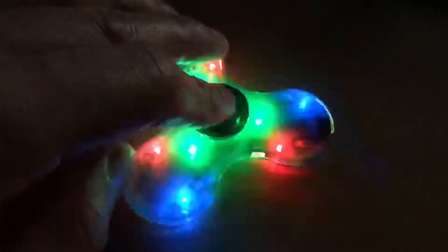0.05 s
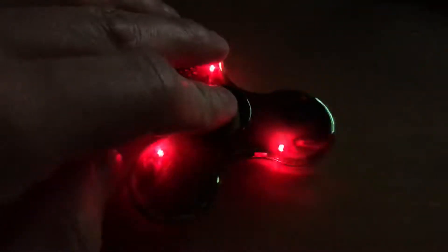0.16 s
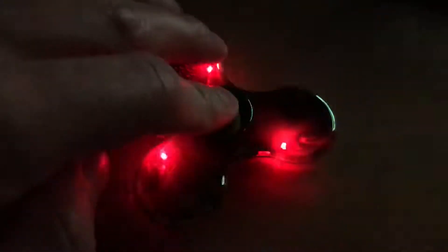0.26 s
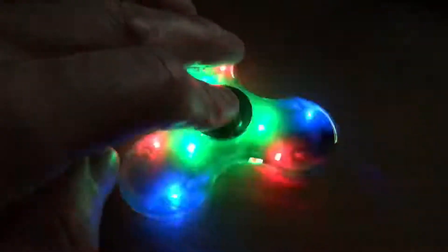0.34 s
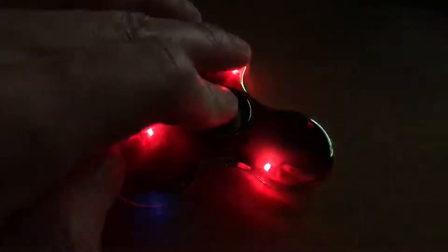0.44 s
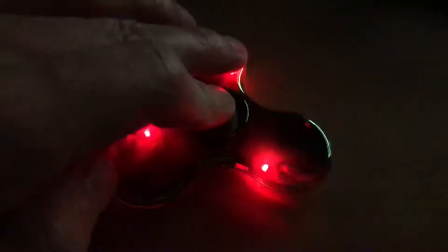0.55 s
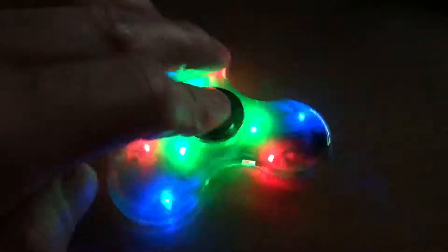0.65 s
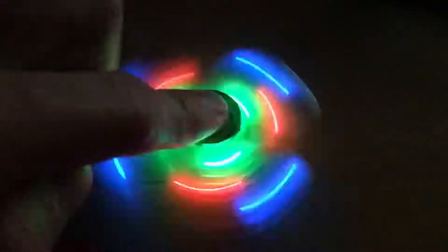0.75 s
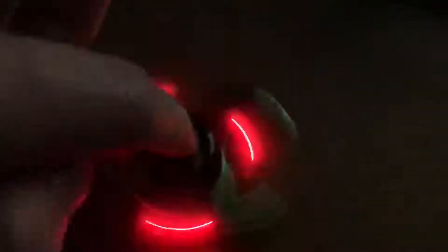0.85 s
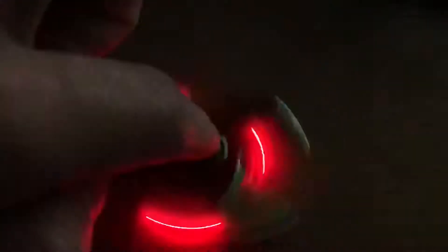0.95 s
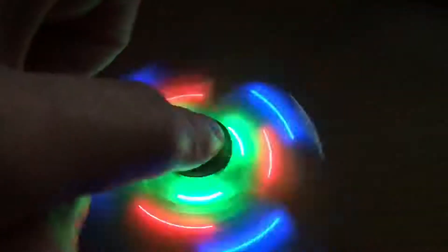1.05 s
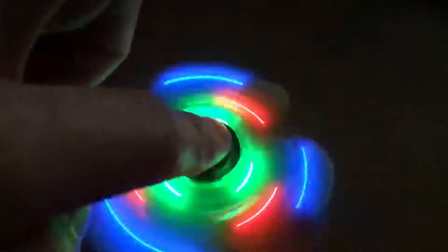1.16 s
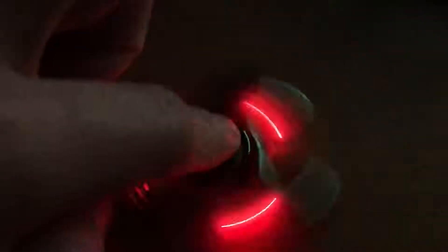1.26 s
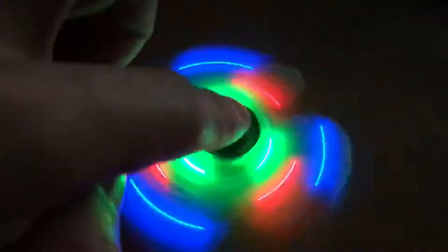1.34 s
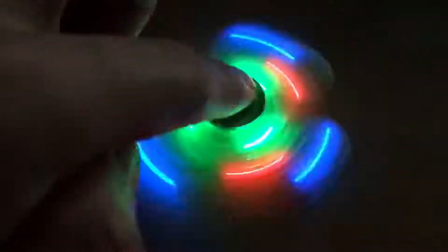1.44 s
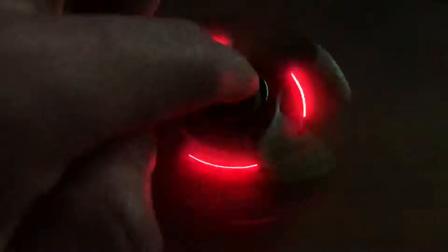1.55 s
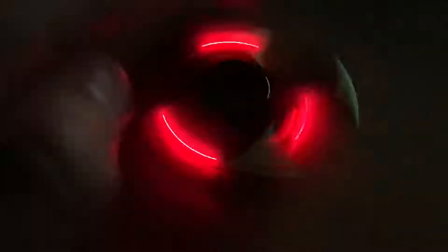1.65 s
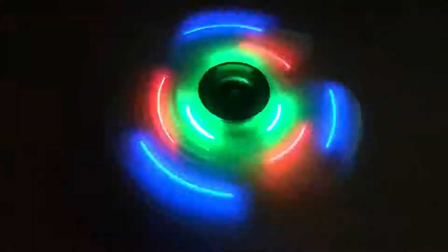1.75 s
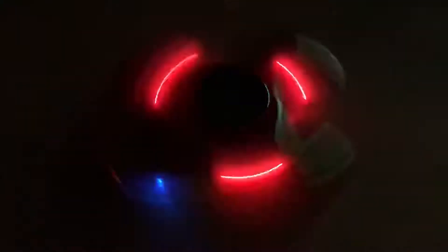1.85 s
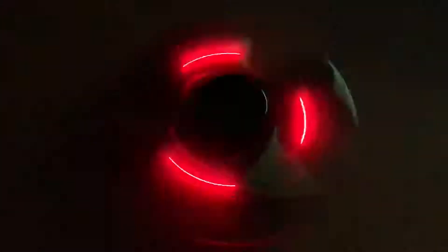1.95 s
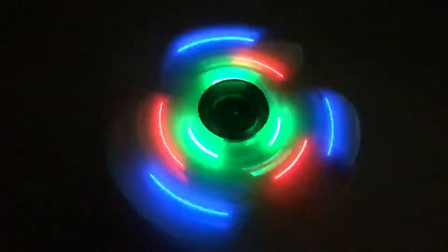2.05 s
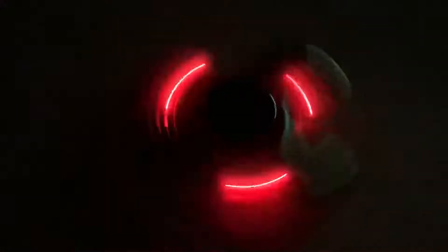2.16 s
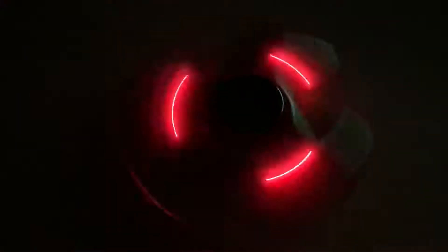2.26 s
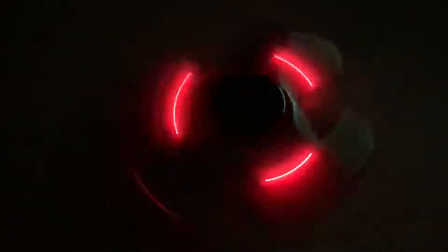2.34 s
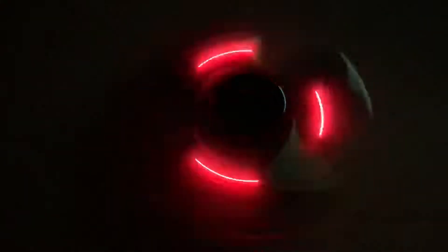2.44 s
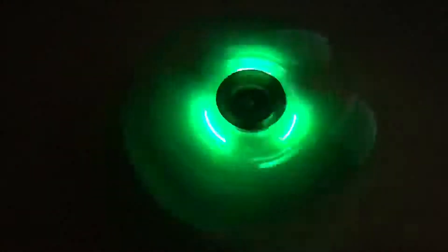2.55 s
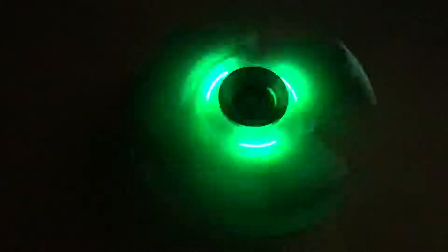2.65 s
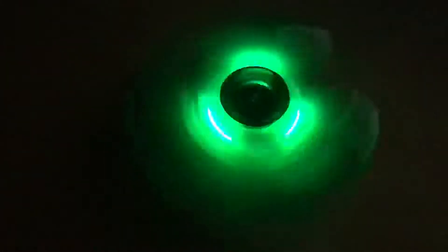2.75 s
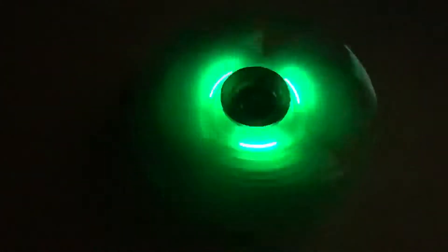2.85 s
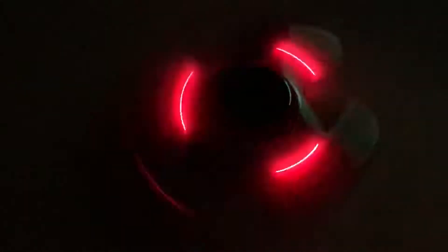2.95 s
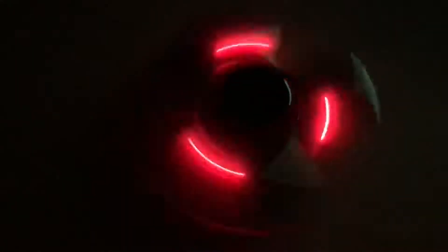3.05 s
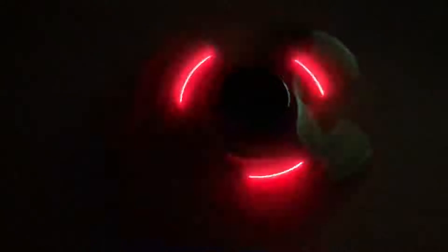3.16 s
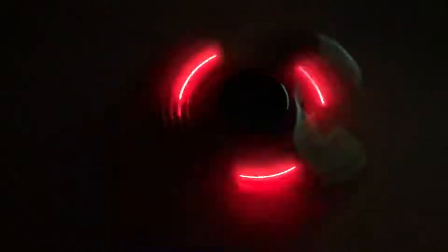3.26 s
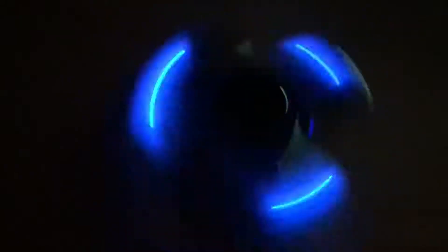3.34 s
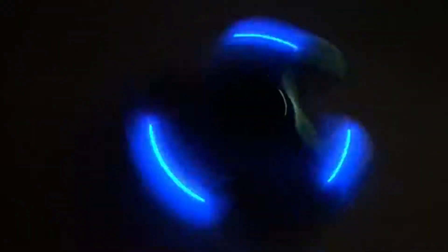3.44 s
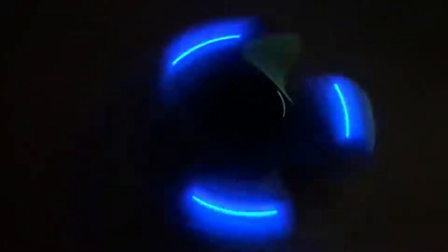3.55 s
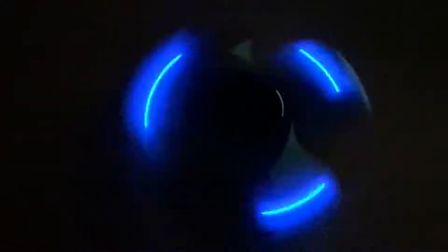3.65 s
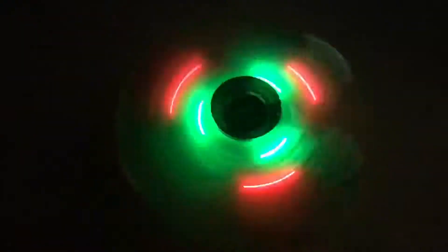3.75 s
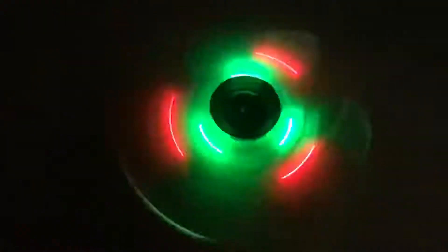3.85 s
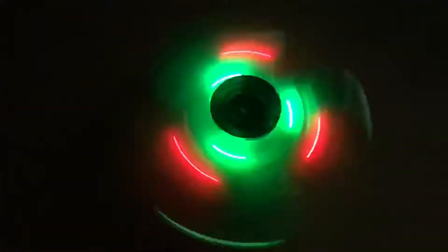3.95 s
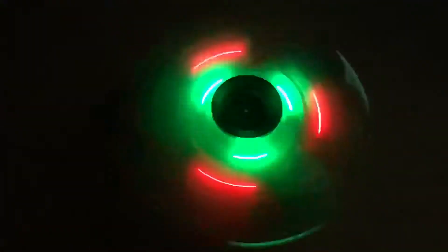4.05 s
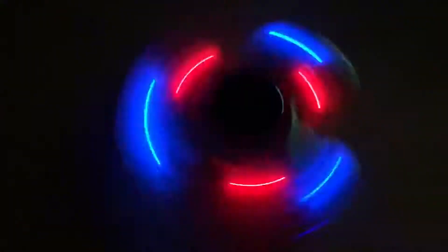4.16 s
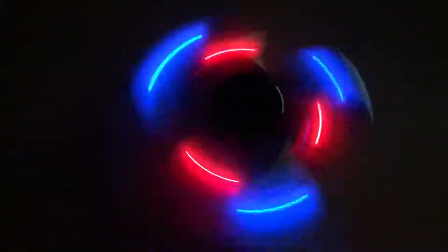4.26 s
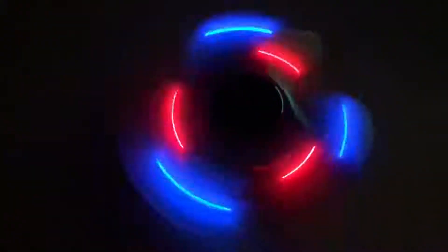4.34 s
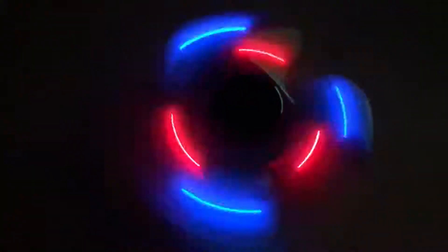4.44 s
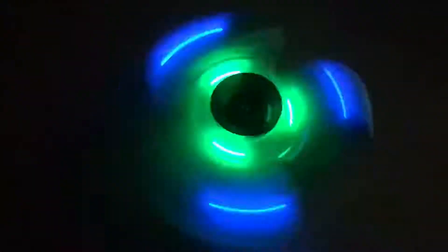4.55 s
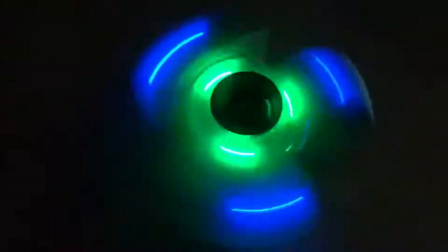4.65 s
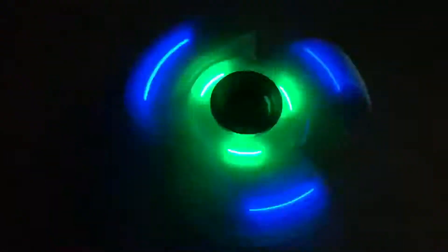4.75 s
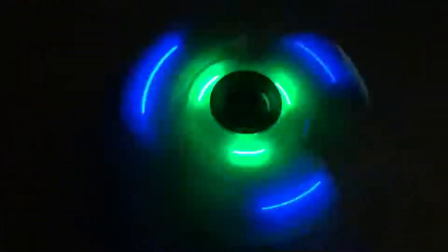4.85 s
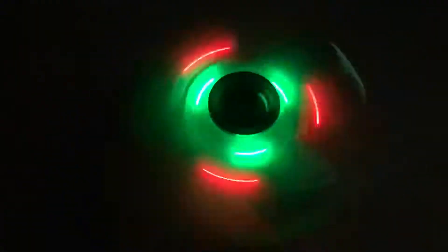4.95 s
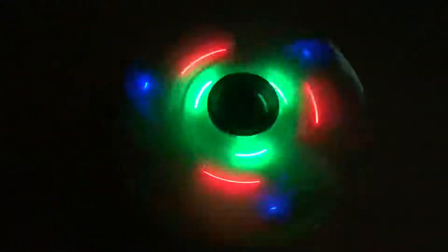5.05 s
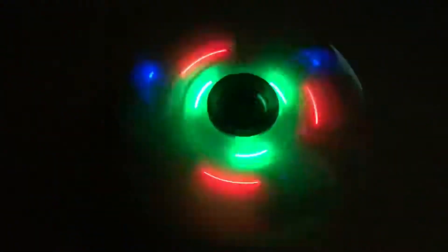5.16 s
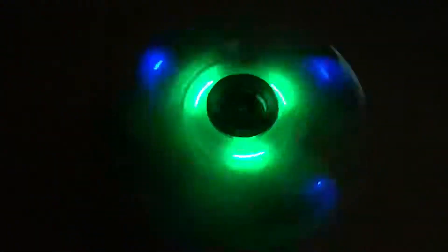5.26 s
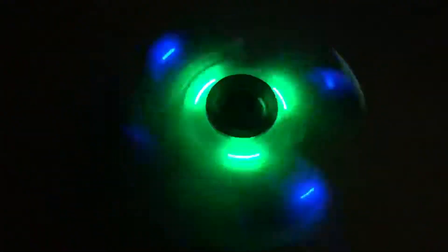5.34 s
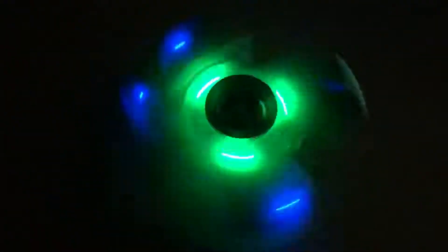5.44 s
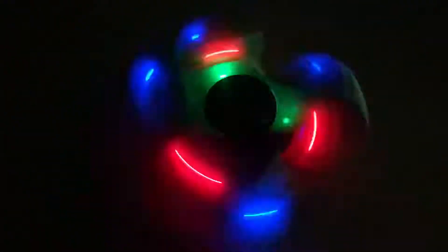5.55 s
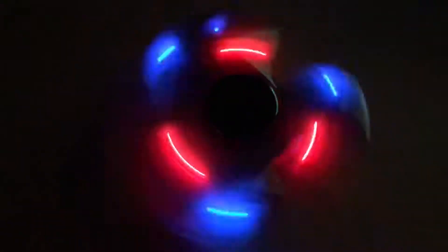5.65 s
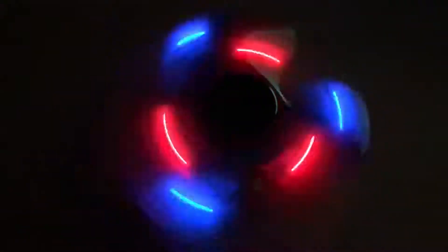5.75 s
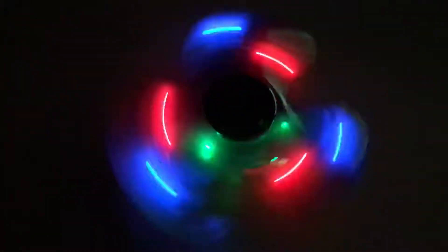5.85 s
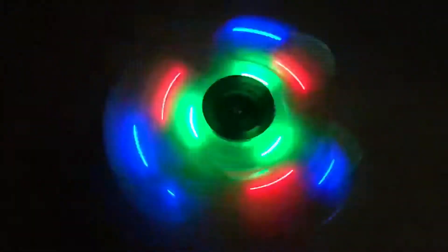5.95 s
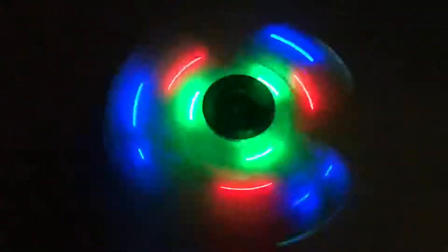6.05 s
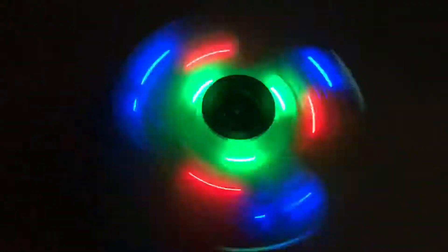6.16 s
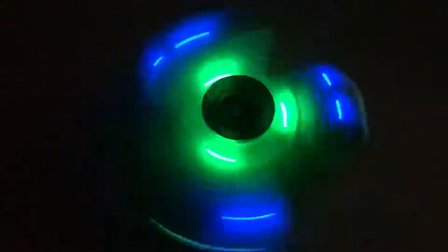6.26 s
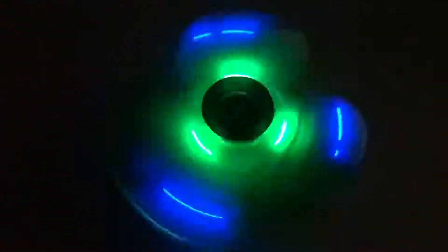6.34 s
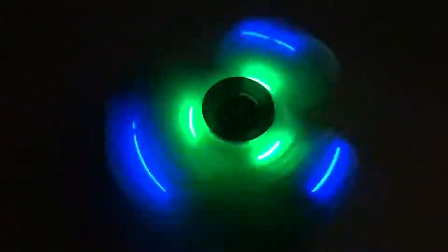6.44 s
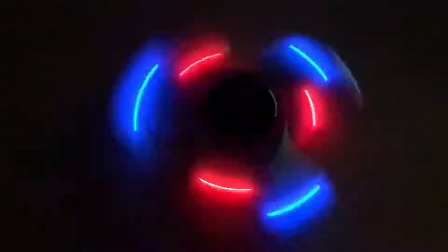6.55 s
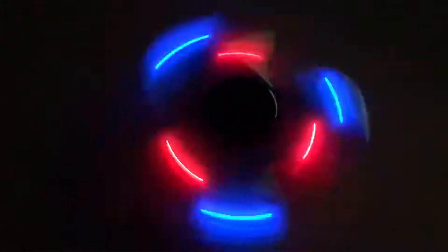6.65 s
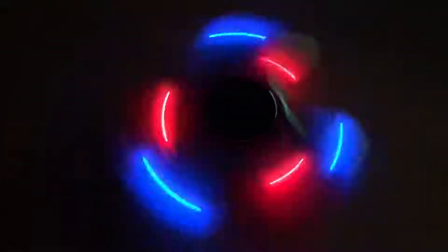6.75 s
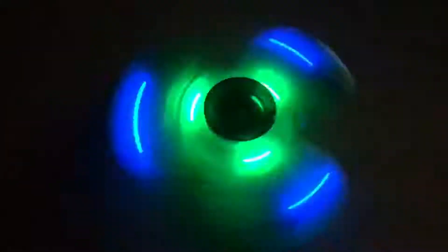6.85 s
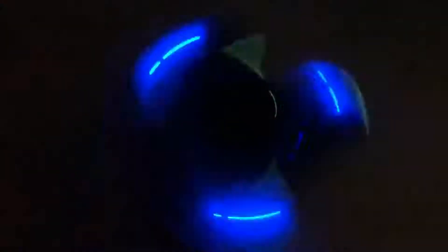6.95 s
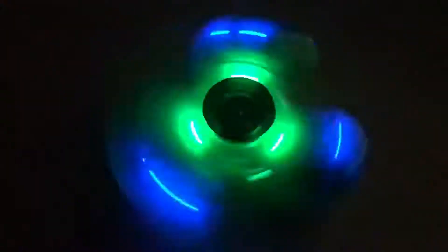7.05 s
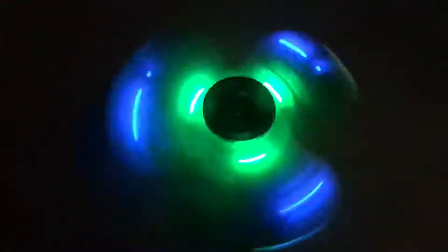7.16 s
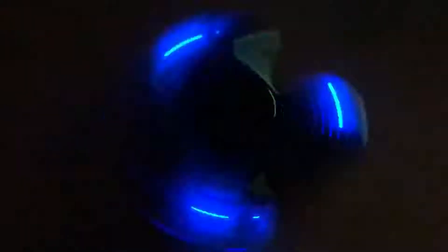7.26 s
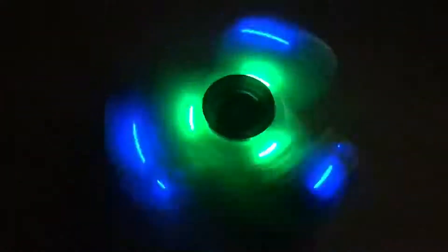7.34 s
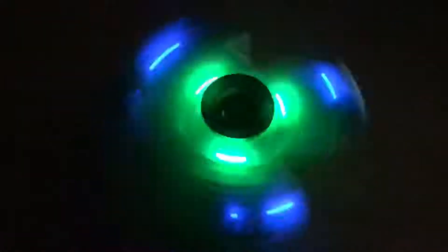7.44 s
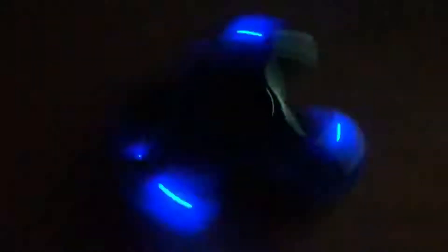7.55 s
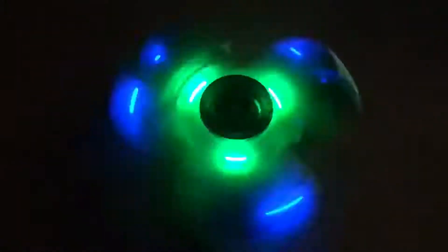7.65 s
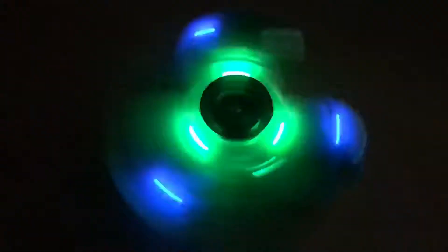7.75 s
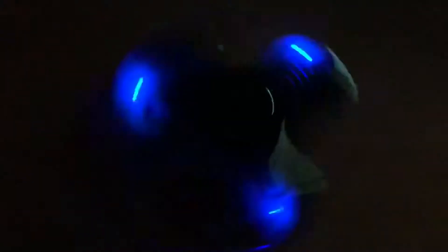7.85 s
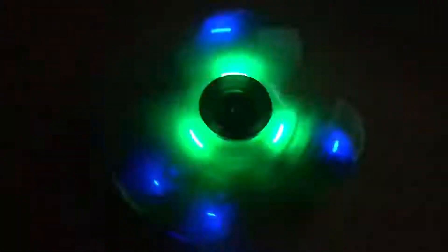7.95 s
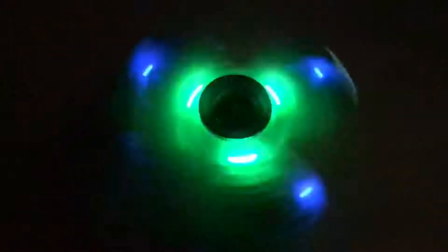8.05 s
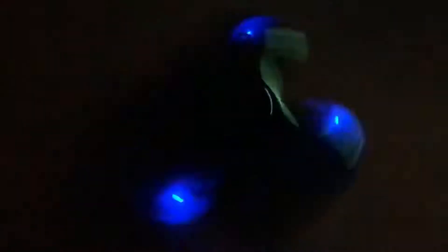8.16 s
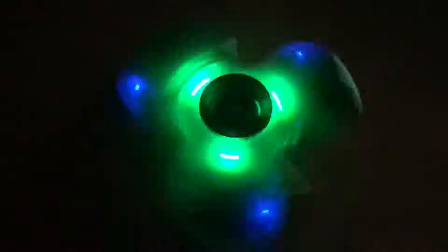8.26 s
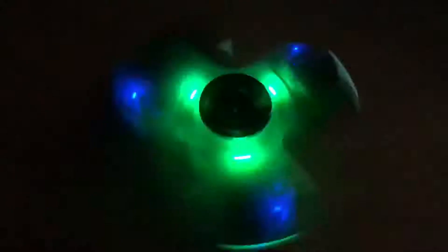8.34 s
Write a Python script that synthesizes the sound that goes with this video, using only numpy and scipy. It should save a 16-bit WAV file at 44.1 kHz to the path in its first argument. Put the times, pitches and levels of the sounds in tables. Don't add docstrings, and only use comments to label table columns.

```python
import sys
import numpy as np
from scipy import signal
from scipy.fft import rfft, irfft
from scipy.io import wavfile

SR = 44100
rng = np.random.default_rng(int(sys.argv[2]) if len(sys.argv) > 2 else 0)


def magnitude_from_level(level_db):
    exponent = np.asarray(level_db, float) / 20
    return 10 ** exponent


def dump_mix(stems):
    frames = np.atleast_2d(stems).T
    limited = np.clip(frames, -1, 1)
    pcm = np.round(limited * 32767).astype(np.int16)
    wavfile.write(sys.argv[1], SR, pcm)


N = 370440

# (frequency [Hz], width [Hz], level [dB])
TABLE_LOW_MODES = [(1126, 88, 0), (1212, 40, -1.5), (1314, 74, -1)]
TABLE_HIGH_MODES = [(1663, 8.6, 11), (1712, 53, -15), (1909, 138, 6.5), (2056, 130, -2.5), (2189, 330, 1),
                    (2610, 1800, -20)]
# (cubic [1/s^4], square [1/s^3], slope [1/s^2], rate at MID_S [1/s])
PASS_RATE = (-.0062, .091, -3.1541, 49.398)
MID_S = 5
PASS_COUNT = np.arange(-211, 151)
LIFT_S, HELD_LOW_DB = 1.5, 8
OUTER_SPOT = 0.28


def rms_one(x):
    return x / np.sqrt(np.mean(x ** 2) + 1e-30)


def in_time(rows, k):
    rows = np.array(rows)
    return magnitude_from_level(np.interp(np.arange(N) / SR, rows[:, 0], rows[:, k], left=-140, right=-140))


def drift(rate):
    r = np.exp(-16 * np.pi * rate / SR)
    chance = rng.standard_normal(N // 8 + SR // 8 + 2)
    slow = signal.lfilter([1], [1, -2 * r, r * r], chance)[SR // 8:]
    return np.interp(np.arange(N) / 8, np.arange(len(slow)), rms_one(slow))


def resonance(x, hz, width):
    r = np.exp(-np.pi * width / SR)
    top = np.array([1, 0, -1]) * (1 - r * r) / 2
    return signal.lfilter(top, [1, -2 * r * np.cos(2 * np.pi * hz / SR), r * r], x + 1e-18)


def body(x, modes):
    return sum(magnitude_from_level(db) * resonance(resonance(x, hz, width), hz, width) for hz, width, db in modes)


def coloured(spectrum):
    hz, db = np.transpose(spectrum)
    bins_hz = np.fft.rfftfreq(N, 1 / SR) + 1
    gain = magnitude_from_level(np.interp(np.log(bins_hz), np.log(hz), db))
    return rms_one(irfft(rfft(rng.standard_normal(N)) * gain, N))


def grains(per_s, spread_db):
    luck = rng.random(N) / (per_s / SR)
    out = rng.random(N) - .5
    hit = luck < 1
    size_db = spread_db * np.minimum(-np.log(luck[hit] + 1e-9), 4)
    out[hit] = np.sign(out[hit]) * magnitude_from_level(size_db)
    return rms_one(out * hit)


def blows(times, levels_db, modes, smear_s, uneven_db, size=1300):
    out, t = np.zeros(N), np.arange(size) / SR
    ragged = rng.standard_normal((len(times), size)) * np.exp(-t / smear_s)
    strength = magnitude_from_level(uneven_db * rng.standard_normal((len(times), len(modes))))
    rung = 0
    for k, (hz, width, db) in enumerate(modes):
        contact = resonance(ragged, hz, 3.9 * width)
        rung = rung + strength[:, [k]] * magnitude_from_level(db) * resonance(contact, hz, width)
    for s, db, shape in zip(times, levels_db, rung):
        at = round(s * SR)
        out[at:at + size] += (magnitude_from_level(db) * shape / np.abs(shape).max())[:N - at]
    return out


def background():
    # (frequency [Hz], density [dB per Hz])
    air_spectrum = [(20, -34), (45, -13), (75, -18.5), (140, -18), (250, -10), (320, -19.5), (365, -13.5),
                    (480, -24), (640, -16.5), (800, -28.5), (1500, -34), (4000, -41.5), (10500, -48),
                    (15800, -46)]
    # (frequency [Hz], rms [dB])
    mains_lines = [(120, -60), (180, -63.5)]
    # (frequency [Hz], width [Hz], rms [dB])
    casing_mode = (254, 15, -59)
    t = np.arange(N) / SR
    hum = 0
    for hz, db in mains_lines:
        hum = hum + magnitude_from_level(db + drift(0.83)) * np.sqrt(2) * np.sin(2 * np.pi * hz * t)
    hz, width, db = casing_mode
    stirred = resonance(rng.standard_normal(N), hz, width)
    casing = magnitude_from_level(db) * rms_one(resonance(stirred, hz, 2 * width))
    return magnitude_from_level(-58.5) * coloured(air_spectrum) + hum + casing


def room(x):
    t, t60_s = np.arange(SR // 2) / SR, 0.12
    tail = rng.standard_normal(len(t)) * magnitude_from_level(-60 * t / t60_s) * (t > .003)
    tail = signal.lfilter([1], [1, -.4], tail)
    return signal.fftconvolve(x, tail / np.sqrt(np.sum(tail ** 2)))[:N]


def cycles():
    passes_per_turn, outer_per_pass = 4.8931, .6367
    slip_s, slip_pass, slip_turn = 3.15, .33, .34
    t = np.arange(N) / SR
    run = np.polyval(np.polyint(PASS_RATE), t - MID_S)
    early = t < slip_s
    return t, run - slip_pass * early, run / passes_per_turn - slip_turn * early, run * outer_per_pass


def finger():
    # (time [s], peak [dB], ring [Hz], bright edge re peak [dB])
    flick_hits = [(0.5761, -34.5, 5370, -17), (0.584, -44.5, 6600, -12), (0.7864, -56, 8140, -12),
                  (0.7938, -39, 5660, -24), (0.7995, -40, 6500, -16), (0.8176, -2.5, 3100, -43),
                  (0.8278, -20, 3240, -26), (0.837, -37, 4900, -17), (0.8426, -6.5, 4320, -17),
                  (0.8488, -31, 4300, -9), (0.8564, -12, 5940, -18), (0.889, -24, 4300, -20),
                  (0.9, -24, 4440, -20), (0.9583, -24, 4350, -10), (1.0326, -34, 4250, -22),
                  (1.055, -23, 4380, -12), (1.0782, -28, 5790, -11), (1.082, -30, 4600, -14),
                  (1.0955, -29, 2990, -11), (1.104, -25.5, 4730, -16), (1.13, -43, 4530, -22),
                  (1.985, -32, 3550, -8)]
    # (time [s], thud [dB], scuff [dB])
    shake_curves = [
        [(0.819, -26, -36), (0.835, -35, -50)],
        [(0.842, -22, -22.5), (0.888, -34.5, -48.5), (0.924, -47, -56), (0.98, -44, -52), (1.045, -74, -67),
         (1.065, -40.5, -50), (1.15, -42, -61.5), (1.24, -68, -67)],
        [(1.985, -47, -59), (1.993, -49, -43), (2.127, -65, -93), (2.143, -80, -57), (2.167, -52, -66),
         (2.2, -74, -69)],
    ]
    # (frequency [Hz], density [dB per Hz])
    thud_spectrum = [(35, -42), (60, -12.5), (174, -1.5), (327, -8.5), (452, -9.5), (715, -14),
                     (796, -23.5), (1060, -16.5), (1500, -24.5), (1950, -53), (3300, -120)]
    scuff_spectrum = [(530, -61), (900, -7.5), (1050, -17), (1170, -14), (1750, -11), (2720, -11),
                      (4490, -7.5), (7680, -19), (8440, -18.5), (15500, -20.5)]
    # (frequency [Hz], width [Hz], level [dB])
    arm_modes = [(605, 180, 4), (1250, 140, -6), (3100, 110, -15.5)]
    crack_modes = [(1130, 210, -9), (4100, 1600, -1), (8200, 630, 0)]
    out = 0
    for s, db, hz, edge_db in flick_hits:
        ring = [(hz, 700, 0), (1.4 * hz, 1200, -7), (8500, 2500, -20)]
        out = out + blows([s], [db - 1.5], ring, smear_s=.0006, uneven_db=0)
        out = out + blows([s], [db + edge_db], [(12800, 2400, 0)], smear_s=0.00086, uneven_db=0)
    arm = blows([.818], [-20], arm_modes, smear_s=0.0039, uneven_db=-7)
    arm += blows([.8178], [-8], crack_modes, smear_s=.0004, uneven_db=0)
    arm += blows([.805], [-50], [(3100, 60, 0)], smear_s=.03, uneven_db=0, size=560)
    edge_modes = [(2620, 900, 0), (3580, 750, -2)]
    release = blows([1.985], [-40], edge_modes, smear_s=0.014, uneven_db=0, size=2600)
    ragged = magnitude_from_level(3.0 * drift(150))
    thud = sum(in_time(c, 1) for c in shake_curves[1:]) * coloured(thud_spectrum) * magnitude_from_level(-5.0)
    scuff = rms_one(ragged * coloured(scuff_spectrum)) * magnitude_from_level(4.0)
    scuff = sum(in_time(c, 2) for c in shake_curves) * scuff
    return out + arm + release + thud + scuff


def rocking():
    # (place in the turn [0-1], half width [turn], level [dB], low modes [dB])
    lean_spots = [(.11, .105, 0, -8), (.575, .085, -1, -11)]
    knock_spot, knock_jitter = .33, .04
    knock_db, knock_chance_db, knock_fade_db_per_s, held_db = -40, 1.6, 1.1, -11.5
    low_mode_db, low_chance_db, low_rise_db_per_s = -2.5, 1.2, 1.5
    rebound_pass, rebound_db = .2, -7

    t, passes, turns, _ = cycles()
    place, half, lean_db, lean_low_db = np.transpose(lean_spots)
    turn = np.interp(PASS_COUNT + knock_spot, passes, turns)[:, None]
    off = (turn - place + .5) % 1 - .5
    count = PASS_COUNT[(np.abs(off) < 1.4 * half).any(axis=1)]
    chance = rng.standard_normal((len(count), 4))
    s = np.interp(count + knock_spot + knock_jitter * chance[:, 0], passes, t)
    held = s < LIFT_S
    away = ((np.interp(s, t, turns)[:, None] - place + .5) % 1 - .5) / half
    fit_db = lean_db - 6 * away ** 4
    db = knock_db + fit_db.max(axis=1) - knock_fade_db_per_s * (s - MID_S)
    db += held_db * held + knock_chance_db * chance[:, 1]
    low_db = lean_low_db[fit_db.argmax(axis=1)] + low_mode_db + low_rise_db_per_s * (s - MID_S)
    low_db += HELD_LOW_DB * held + low_chance_db * chance[:, 2]
    back_s = s + rebound_pass / np.polyval(PASS_RATE, s - MID_S)
    back_db = db + rebound_db + knock_chance_db * chance[:, 3]
    s, db, low_db = np.r_[s, back_s], np.r_[db, back_db], np.r_[low_db, low_db]
    high = blows(s, db - 8.5, TABLE_HIGH_MODES, smear_s=0.0033, uneven_db=-2)
    return high + blows(s, db + low_db + 0.5, TABLE_LOW_MODES, smear_s=0.0024, uneven_db=3.5)


def dent_snaps():
    # (place in the pass [0-1], level [dB])
    dent_spots = [(.39, -4), (.72, -7.5), (.08, -11)]
    snap_db, chance_db, fade_db_per_s = -45.5, 2.5, 0.2
    outer_db, tilt_db = 6, 2
    t, passes, turns, outer = cycles()
    place, dent_db = np.transpose(dent_spots)
    count = PASS_COUNT[:, None]
    chance = rng.standard_normal((len(count), len(place), 2))
    s = np.interp(count + place + .025 * chance[..., 0], passes, t)
    load_db = outer_db * np.cos(2 * np.pi * (np.interp(s, t, outer) - OUTER_SPOT))
    load_db += tilt_db * np.cos(4 * np.pi * np.interp(s, t, turns))
    db = snap_db + dent_db + load_db - fade_db_per_s * (s - MID_S) + chance_db * chance[..., 1]
    return s.ravel(), db.ravel()


def bearing():
    # (time [s], whirr [dB], share felt by the table [dB])
    spin_curve = [(.82, -42, -3), (.90, -35.5, -22), (.97, -42, -28), (1.01, -48.5, -12), (1.10, -44, -43),
                  (1.18, -47, -10), (1.27, -46.5, -6), (1.38, -45.5, -19), (1.54, -44.5, -17),
                  (1.64, -45.5, -12), (2.6, -45.5, -13), (2.8, -48, -14), (3.15, -46.5, -10),
                  (3.5, -47, -16), (5.5, -48.5, -13), (7.5, -50.5, -12), (8.2, -51, -14.5),
                  (8.4, -52.5, -11)]
    # (time [s], peak [dB])
    hard_snaps = [(1.19, -40), (1.261, -44), (1.3863, -42), (1.459, -29), (1.5072, -38), (1.524, -30),
                  (1.753, -32.5), (2.1417, -36), (2.169, -34), (2.515, -37), (2.841, -37), (2.913, -47),
                  (3.0341, -41), (3.178, -34.5), (3.3194, -53), (3.4107, -37), (4.1418, -46),
                  (4.554, -36.5), (4.9064, -40.5), (4.9458, -41), (5.2297, -36), (6.2285, -41),
                  (6.7177, -48), (6.786, -45), (7.133, -44), (7.4505, -37), (7.7553, -44), (7.97, -40),
                  (8.0497, -40), (8.351, -42)]
    grit_cracks = [(2.9925, -46), (3.1791, -46), (3.5937, -50), (3.6306, -49), (4.1788, -52), (5.2289, -46),
                   (5.9668, -51), (6.4008, -48), (7.4115, -54), (7.6435, -42), (7.7552, -55),
                   (7.7833, -42.5), (7.8949, -45), (8.3509, -46)]
    # (frequency [Hz], width [Hz], level [dB])
    race_modes = [(3690, 140, 5), (4265, 690, -9.5), (4469, 440, 6.5), (4631, 182, 2.5), (5250, 1240, -1),
                  (6040, 1050, -1), (6880, 230, -1.5)]
    ball_modes = [(8370, 550, -8), (9310, 1350, -10.5), (11600, 2200, -20), (13100, 4300, -19.5),
                  (14800, 3100, -16.5)]
    cap_modes = [(2583, 810, -18.5), (3030, 910, -9)]
    snap_modes = [(3985, 70, -14.5), (4250, 440, -8.5), (4488, 120, -1), (5680, 780, -14.5)]

    t, _, turns, outer = cycles()
    clumps = magnitude_from_level(2.0 * drift(35))
    chatter = grains(800 * clumps, spread_db=1.0)
    cap_db = np.where(t < LIFT_S, 4.5, 3 - 0.4 * (t - LIFT_S))
    race = magnitude_from_level(cap_db) * body(chatter + rng.standard_normal(N), cap_modes)
    for mode in race_modes:
        waver = magnitude_from_level(1.5 * drift(30))
        contacts = chatter * magnitude_from_level(2.6 * drift(250)) + 0.5 * grains(4000 * clumps, spread_db=2.0)
        race += waver * body(contacts, [mode])
    for mode in ball_modes:
        race += body(0.2 * chatter + 1.28 * grains(9000 * clumps, spread_db=2.5), [mode])
    swirl_db = np.cos(2 * np.pi * (outer - OUTER_SPOT))
    race = rms_one(race) * magnitude_from_level(-6.0 + swirl_db)

    rattle = grains(900, spread_db=3.5) * magnitude_from_level(6 * np.cos(4 * np.pi * (turns - .15)))
    high_gain = magnitude_from_level(-HELD_LOW_DB * (t < LIFT_S))
    table = rms_one(body(rattle, TABLE_LOW_MODES) + high_gain * body(rattle, TABLE_HIGH_MODES))
    table = in_time(spin_curve, 2) * magnitude_from_level(-1.0) * table
    whirr = in_time(spin_curve, 1) * magnitude_from_level(0.5 * drift(17.0))

    s, db = np.hstack([np.transpose(hard_snaps), dent_snaps()])
    snaps = blows(s, db + 1.5, snap_modes, smear_s=.0007, uneven_db=3.5, size=450)
    bright_modes = race_modes[4:] + ball_modes[:2]
    snaps += blows(s, db - 12, bright_modes, smear_s=0.00033, uneven_db=7.0, size=200)
    s, db = np.transpose(grit_cracks)
    snaps += blows(s, db, ball_modes, smear_s=0.00099, uneven_db=12)
    return whirr * (race + table) + snaps


def scene():
    toy = bearing() + rocking() + finger()
    return (toy + magnitude_from_level(-17) * room(toy) + background())[None]


def band_limit(x):
    return signal.sosfilt(signal.butter(12, 16850, fs=SR, output="sos"), x)


def record(dry):
    low_pass = signal.ellip(14, 1, 45, 15750, fs=SR, output="sos")
    return band_limit(signal.sosfilt(low_pass, dry))


dry = scene()
out = record(dry)
dump_mix(out)
```